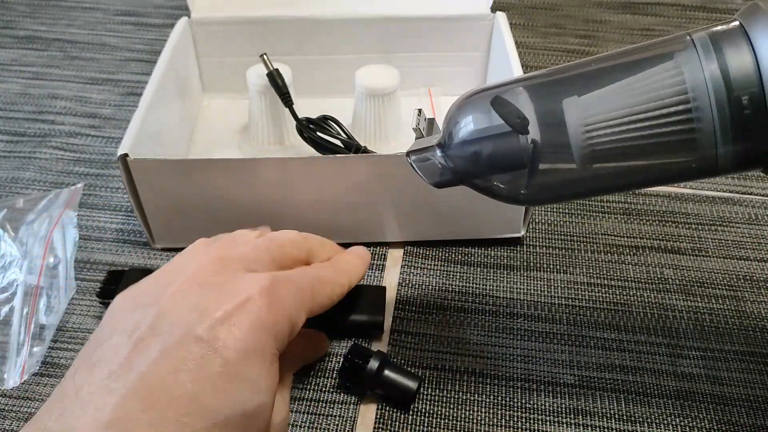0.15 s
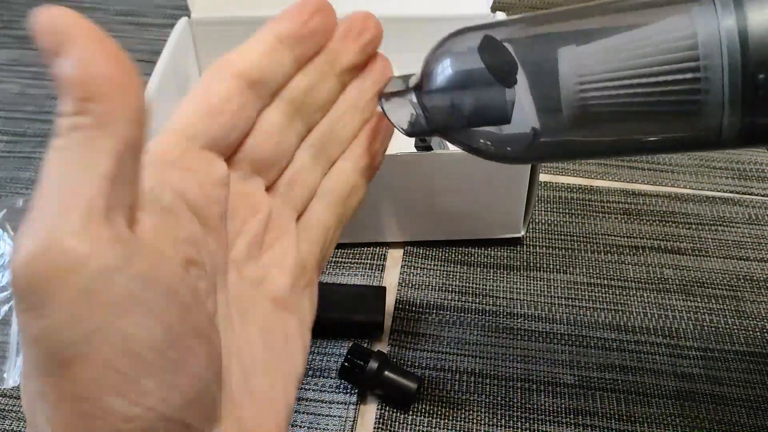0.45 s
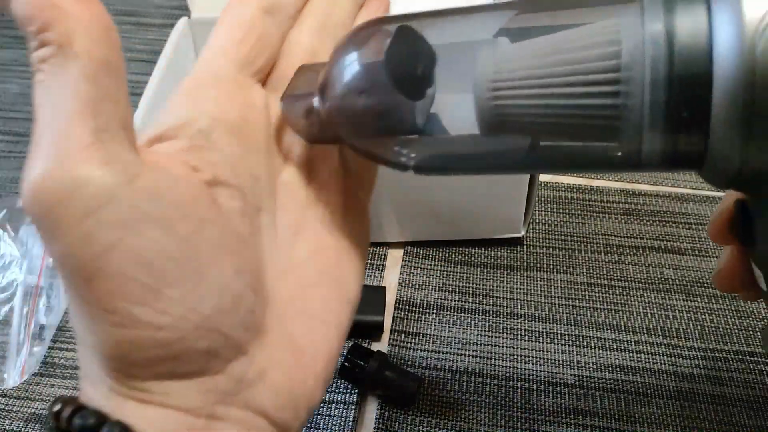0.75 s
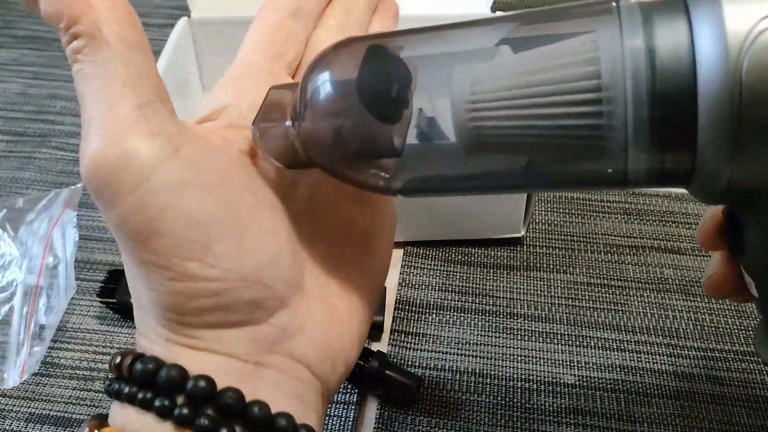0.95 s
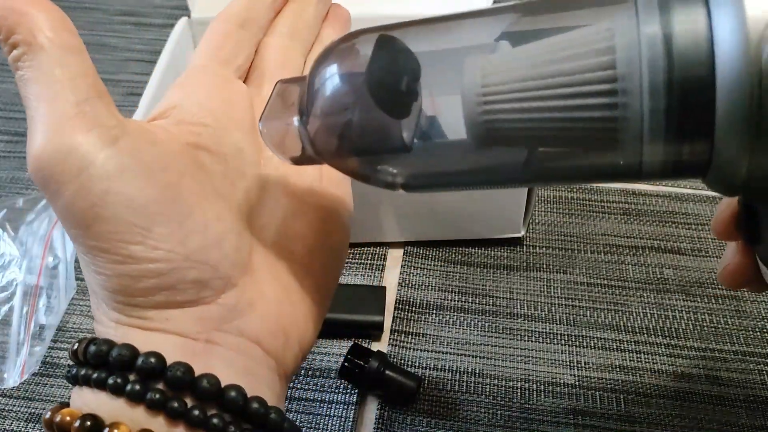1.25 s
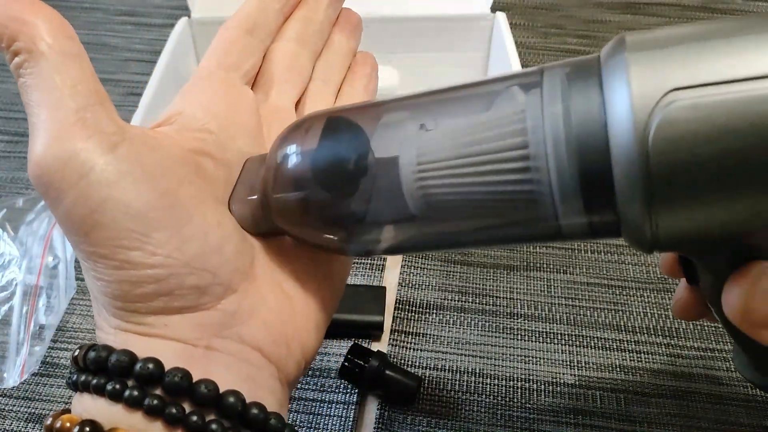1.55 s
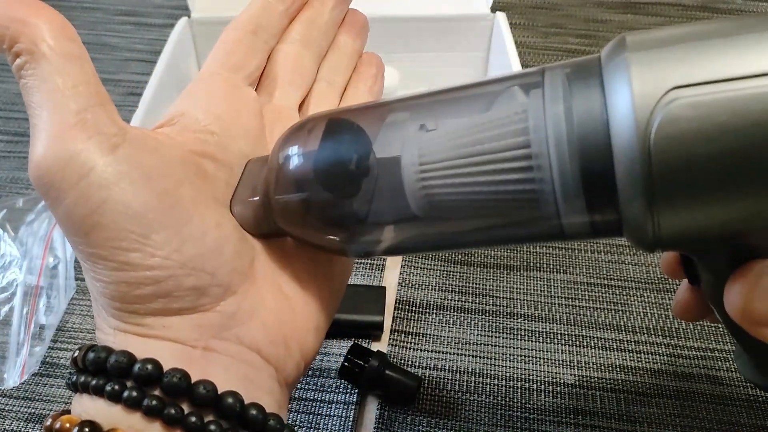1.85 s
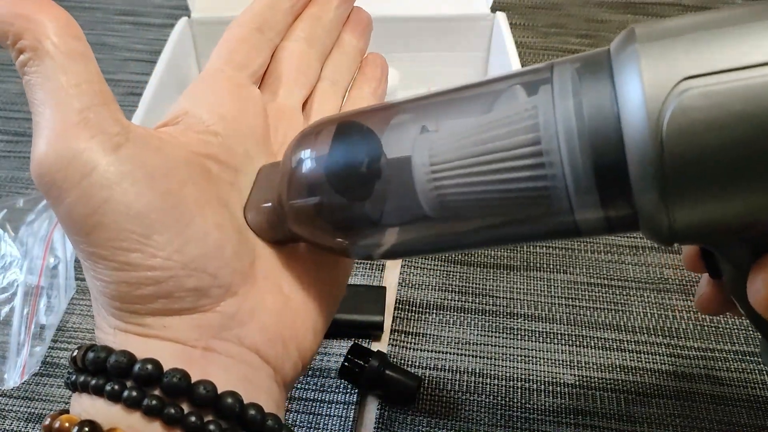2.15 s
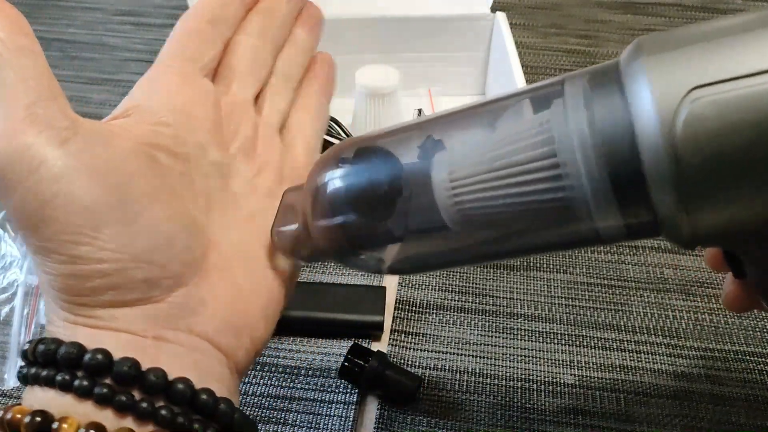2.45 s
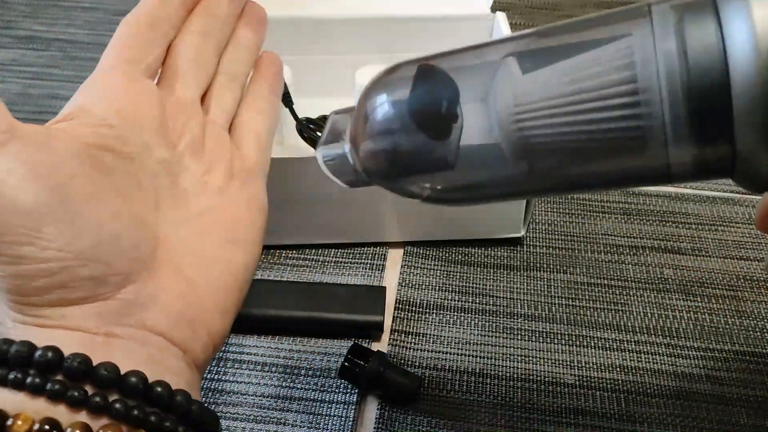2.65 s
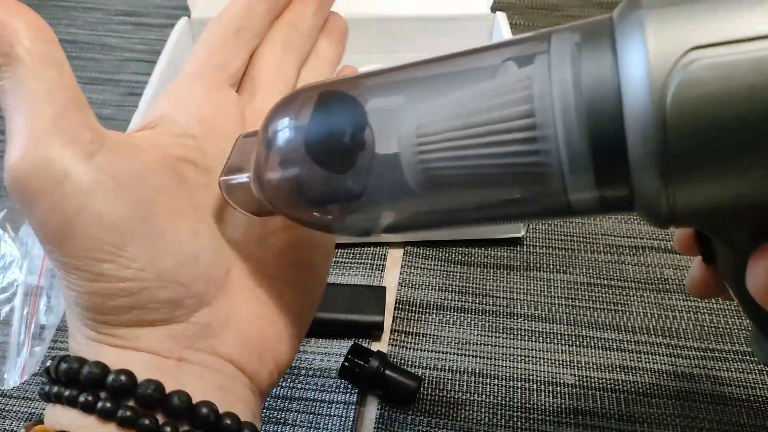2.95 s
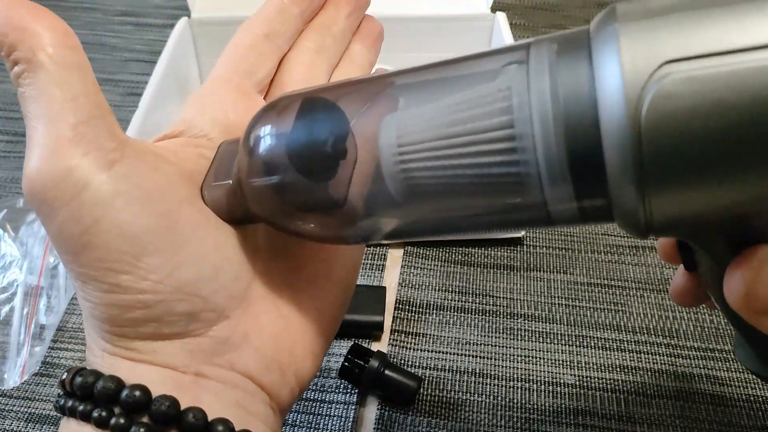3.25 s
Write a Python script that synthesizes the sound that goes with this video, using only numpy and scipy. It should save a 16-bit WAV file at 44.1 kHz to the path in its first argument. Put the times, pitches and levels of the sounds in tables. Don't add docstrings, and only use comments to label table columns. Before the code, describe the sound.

Cordless hand vacuum runs close up, airy roar stopping and motor pitch rising when twice blocked

```python
import sys
import numpy as np
from scipy import signal
from scipy.io import wavfile
from scipy.ndimage import uniform_filter1d

SR = 44100
rng = np.random.default_rng(int(sys.argv[2]) if len(sys.argv) > 2 else 0)


def invert_db(x):
    u = np.asarray(x, float) / 20
    return 10 ** u


def master(y):
    cut = np.clip(np.atleast_2d(y).T, -1, 1)
    pcm = np.round(cut * 32767)
    wavfile.write(sys.argv[1], SR, pcm.astype(np.int16))


N = 149940

# seals at t/s, lets go at t/s
PALM_SEALS = [
    (1.635, 2.545),
    (3.255, 3.6),
]
# t/s, intake roar level/dB, edge whistle level/dB
NOZZLE_AIR = [
    [(0.0, -25.5, -28), (0.052, -28.5, -27), (0.36, -26.5, -27), (0.538, -30, -29.5), (0.582, -29.5, -36),
     (0.742, -32.5, -31.5), (1.45, -27.5, -23), (1.56, -32, -31.5)],
    [(2.6, -29, -29), (2.618, -27, -29.5), (2.926, -28, -29.5), (2.978, -28.5, -23), (3.0, -26, -26),
     (3.086, -31.5, -26.5), (3.222, -28.5, -23.5), (3.23, -35, -24)],
]


def rms_one(x):
    return x / np.sqrt(np.mean(x ** 2) + 1e-20)


def in_time(rows):
    s, *columns = np.transpose(rows)
    return [np.interp(np.arange(N) / SR, s, c) for c in columns]


def at_hz(points, hz):
    table_hz, values = np.transpose(points)
    return np.interp(np.log(hz), np.log(table_hz), values)


def drift(rate):
    r = np.exp(-80 * np.pi * rate / SR)
    slow = signal.lfilter([1], [1, -2 * r, r * r], rng.standard_normal(N // 40 + 2002))[2000:]
    return np.interp(np.arange(N) / 40, np.arange(len(slow)), rms_one(slow))


def resonance(x, hz, width_hz):
    r = np.exp(-np.pi * width_hz / SR)
    return signal.lfilter([1, 0, -1], [1, -2 * r * np.cos(2 * np.pi * hz / SR), r * r], x)


def dip(x, hz, width_hz, share):
    r = np.exp(-np.pi * width_hz / SR)
    return x - share * (1 - r * r) / 2 * resonance(x, hz, width_hz)


def delayed(x, lag_s):
    return np.interp(np.arange(N) - lag_s * SR, np.arange(N), x)


def low_band(x, low, high):
    return signal.sosfilt(signal.butter(2, [low, high], "band", fs=SR, output="sos"), x)


def pair():
    return rng.standard_normal((3, N + SR // 10))


def air(spectrum, likeness, left_lag_s, patchy_db, shared_db):
    # f/Hz, left over right level/dB
    pan = [(60, -3), (200, 2.5), (1000, -2), (3000, 0), (6000, -4.5), (9000, -2.5), (13000, -11),
           (15000, -7)]
    table_hz = np.array(spectrum)[:, 0]
    edges = table_hz[0] * 2 ** np.arange(0, np.log2(table_hz[-1] / table_hz[0]) + .3, 1 / 3)
    out, together, lag = 0, drift(7.3), round(left_lag_s * SR)
    white = [pair(), pair()]
    for k, (low, high) in enumerate(zip(edges, np.minimum(edges[1:], .45 * SR))):
        mid, left, right = low_band(white[k % 2], low, high)
        hz = np.sqrt(low * high)
        alike = np.clip(at_hz(likeness, hz), -1, 1)
        shared = np.sqrt(abs(alike)) * np.array([np.sign(alike) * np.roll(mid, lag), mid])
        both = shared + np.sqrt(1 - abs(alike)) * np.array([left, right])
        patchy = patchy_db * np.array([drift(6.5), drift(3.3)])
        gain = invert_db(at_hz(spectrum, hz) + shared_db * together + patchy)
        out = out + gain * both[:, -N:] * invert_db(at_hz(pan, hz) * np.array([[.5], [-.5]]))
    return rms_one(out)


def sealed():
    t, seal_s = np.arange(N) / SR, .041
    out = np.zeros(N)
    for a, b in PALM_SEALS:
        out += np.clip((t - a) / seal_s + .5, 0, 1) - np.clip((t - b) / seal_s + .5, 0, 1)
    return out


def unloading():
    speed_up_s, slow_down_s = .25, .205
    leak_after_s, leak_sag = .645, 1.8
    t, out = np.arange(N) / SR, np.zeros(N)
    for a, b in PALM_SEALS:
        level = out[int(a * SR)]
        held_s = np.clip(t, a, b) - a
        up = 1 - (1 - level) * np.exp(-held_s / speed_up_s)
        up = up - leak_sag * np.maximum(held_s - leak_after_s, 0) ** 2
        out = np.where(t < a, out, up * np.exp(-np.maximum(t - b, 0) / slow_down_s))
    return out


def gusts(seal):
    t = np.arange(N) / SR
    puffs = np.zeros(N)
    for row in PALM_SEALS:
        for s, db in zip(row, (0, -7)):
            puffs += invert_db(db) * np.exp(-((t - s) / .016) ** 2) * np.sin(2 * np.pi * 59 * (t - s))
    wind = rms_one(low_band(rng.standard_normal((2, N)), 20, 75))
    roar_db = in_time(NOZZLE_AIR[0] + NOZZLE_AIR[1])[0]
    follows_db = 1.5 * (roar_db + 30) * (2 - seal) - 12 * seal
    wind_db = -57 + 4 * drift(2.7) + follows_db + np.array([[-3.], [3.]])
    return invert_db(wind_db) * wind + invert_db(-39 + np.array([[-4.], [2.]])) * puffs


def fan(seal):
    # f/Hz, level/dB per Hz
    fan_spectrum = [(60, -32), (300, -10), (1300, -17.5), (2300, -3), (4500, -2.5), (8300, -12.5),
                    (11000, -24), (17000, -25)]
    # f/Hz, left-right likeness [-1..1]; below 0 the microphones move in opposition
    fan_likeness = [(60, .1), (1250, .9), (1550, -.65), (2300, -.65), (3000, -.7), (3900, .4), (6000, 0),
                    (8500, .55)]
    rush = air(fan_spectrum, fan_likeness, 0, patchy_db=0.0, shared_db=1.0)
    return invert_db(-21 - 8 * (1 - seal)) * rush


def intake(seal):
    # f/Hz, level/dB per Hz
    roar_spectrum = [(35, -63), (60, -93), (102, -17.5), (199, -1), (423, -3), (460, 5.5), (670, -63),
                     (772, -13), (1000, -17.5), (1300, -51), (2200, -120)]
    # f/Hz, level/dB per Hz
    hiss_spectrum = [(800, -25), (1600, 1.5), (2700, -6.5), (3600, 1), (6000, 2.5), (7800, -5),
                     (10500, -20), (17000, -11.5)]
    # f/Hz, left-right likeness [0..1]
    nozzle_likeness = [(60, 0.1), (150, 1), (400, 0.9), (800, .65), (1800, 0.92), (3100, 0.97), (4200, 0.2),
                       (15000, 0.05)]
    left_lag_s, cup_hz, whistle_hz = -.00018, 458, 11460
    roar_db, whistle_db = in_time(NOZZLE_AIR[0] + NOZZLE_AIR[1])

    hoot = rms_one(resonance(resonance(rng.standard_normal(N), cup_hz, 30), cup_hz, 27))
    roar = air(roar_spectrum, nozzle_likeness, left_lag_s, patchy_db=0.0, shared_db=-0.54)
    roar = invert_db(roar_db) * (roar + invert_db(-9 + 2 * drift(4.2)) * hoot)

    edge = rng.standard_normal((2, N)) + 0.64 * rng.standard_normal(N)
    edge = resonance(resonance(edge, whistle_hz, 540), whistle_hz, 2000)
    whistle = invert_db(whistle_db + 1.03 * drift(41) + np.array([[-2.], [5.]])) * rms_one(edge)

    hiss = invert_db(-17.5) * air(hiss_spectrum, nozzle_likeness, left_lag_s, patchy_db=1.5, shared_db=0.3)
    hiss = dip(hiss, 2850, 450, .35)
    hiss = dip(hiss, 4200, 400, .45)
    return (1 - seal) * (roar + whistle + hiss)


def close_echoes(noise):
    bounces = [
        (.0009, .0011, -4.5),
        (.0021, .0017, -8),
        (.0034, .0029, -10),
    ]
    bright = signal.sosfilt(signal.butter(2, 7000, "high", fs=SR, output="sos"), noise)
    for *lags, db in bounces:
        bounce = [delayed(v, s + .00002 * drift(0.96)) for v, s in zip(bright, lags)]
        noise = noise + invert_db(db) * np.array(bounce)
    return noise


def motor(seal):
    # t/s, f/Hz (unused), level/dB, left over right level/dB
    whine = [(0.0, 1209, -27, -14), (0.38, 1199, -28.5, -17.5), (0.99, 1199, -23, -3.5),
             (1.64, 1199, -24, -5.5), (1.72, 1236, -20.5, -3), (1.92, 1287, -19.5, -2),
             (2.31, 1318, -20.5, 2.5), (2.54, 1317, -18.5, 1.5), (2.64, 1257, -23, -1.0),
             (2.84, 1212, -19.5, -2), (3.14, 1199, -23, 1), (3.28, 1210, -20.5, -2.5), (3.38, 1247, -19, 4),
             (3.4, 1284, -22.5, 3)]
    # t/s, left lead of the whine/rad
    whine_lead = [(0, 1.8), (.7, -1), (1.5, -0.64), (1.9, -0.0045), (2.6, -0.54), (3.4, -0.086)]
    orders = [(1, -1, 0), (1, 1, 0), (2, 0, 0), (2, 1, 0), (2, 2, 0), (3, -1, 0), (3, 0, 0), (3, 1, 0),
              (4, -1, 0), (4, 0, 0), (4, 1, 0), (5, -1, 1), (5, 0, 0), (5, 1, 0), (6, 0, 0), (7, -2, 0),
              (7, -1, 0), (7, 0, 0), (3, -1, 1), (3, -2, 1), (4, 0, -1), (1, -1, 1), (4, -2, 0), (5, -1, 0)]
    # left open/dB, right open/dB, left sealed/dB, right sealed/dB
    overtones = [(-50, -44, -42, -40), (-54, -54, -54, -54), (0, 0, 0, 0), (-48, -45, -27, -25.5),
                 (-55, -55, -36, -35), (-29, -39, -31, -24), (0, 0, 0, 0), (-37, -34, -34, -33),
                 (-39, -35, -39, -37), (0, 0, 0, 0), (-37, -35, -39, -34), (-46, -42, -42, -35),
                 (0, 0, 0, 0), (-50, -41, -46, -39), (-46, -38, -46, -38), (-60, -60, -57, -57),
                 (-60, -60, -57, -58), (-52, -51, -52, -52), (-41, -44, -34, -29), (-44, -48, -52, -44),
                 (-46, -48, -40, -39), (-58, -58, -53, -54), (-44, -41, -48, -46), (-43, -41, -45, -39)]
    # t/s, second/dB, third/dB, fourth/dB, fifth/dB
    beams = [
        [(.1, -40, -55, -28, -43), (.54, -27.5, -27, -27.5, -44), (.75, -29, -24.5, -19, -36),
         (1.1, -25.5, -51, -45, -36), (1.4, -29, -46, -30, -28), (1.61, -28, -34, -37, -33),
         (1.82, -24, -25, -26, -35), (2.02, -21, -26.5, -20, -38), (2.21, -22.5, -33, -27.5, -45),
         (2.45, -21, -27, -27.5, -38), (2.62, -33, -25.5, -31, -46), (2.81, -30, -51, -38, -46),
         (3.02, -25.5, -28, -24, -45), (3.23, -25, -50, -27, -35)],
        [(.1, -38.5, -49, -37, -28), (.35, -37, -53, -39, -31), (.54, -40, -27, -42, -28),
         (.75, -43, -35, -28, -34), (1., -26, -38, -22, -28), (1.4, -36, -28.5, -24, -34),
         (1.61, -27, -25.5, -24.5, -41), (1.82, -28, -23, -27, -26), (2.02, -36, -30, -22, -27),
         (2.21, -44, -40, -21, -31), (2.45, -20, -34, -28.5, -25), (2.62, -32, -27, -30, -25),
         (2.81, -28.5, -31, -39, -42), (3.02, -30, -35, -32, -37), (3.23, -25.5, -43, -27, -41)],
    ]
    swell = {(2, 1, 0): (-6, 20), (3, -1, 0): (-12, 11), (3, -1, 1): (18, 13), (4, -1, 0): (30, -14),
             (5, -1, 0): (25, 25)}
    leads = {(1, -1, 0): (-1, .1), (2, 0, 0): (-1.4, -2), (2, 1, 0): (-3.4, -2.2), (3, -1, 0): (.6, .1),
             (3, -1, 1): (1, -.2), (3, 0, 0): (-1, .4), (3, 1, 0): (-.8, .7), (4, 0, 0): (-3.7, .5),
             (4, 1, 0): (1.5, -1), (5, 0, 0): (1.6, 2.5), (6, 0, 0): (-1.5, -.2)}
    open_hz, sealed_hz = 1191.6, 1332
    cage_open, cage_sealed = .1152, .1163
    slip = .0178
    wander_db, wander_per_s = 1.2, 1.5

    free = unloading()
    hz = (open_hz + (sealed_hz - open_hz) * free) * (1 + .0005 * drift(5.4))
    turn = 2 * np.pi * np.cumsum(hz) / SR
    cage = 2 * np.pi * np.cumsum(hz * (cage_open + (cage_sealed - cage_open) * free)) / SR
    _, db, pan_db = in_time(whine)
    lead, = in_time(whine_lead)
    out = invert_db(db + np.array([pan_db, -pan_db]) / 2) * np.sin([turn + lead, turn])

    soft = uniform_filter1d(seal, size=4000)
    turned = soft * np.minimum(free / .75, 1) ** 2
    gained = np.maximum(free - .76, -.25) * soft
    beam = [{(k, 0, 0): db for k, db in zip((2, 3, 4, 5), in_time(rows))} for rows in beams]
    for order, row in zip(orders, overtones):
        k, side, beat = order
        start = rng.uniform(0, 2 * np.pi)
        lead_open, lead_sealed = leads.get(order, (-np.pi / 2, -np.pi / 2))
        lead = lead_open + (lead_sealed - lead_open) * turned
        for ear in (0, 1):
            db = row[ear] + (row[ear + 2] - row[ear]) * soft + beam[ear].get(order, 0)
            db = db + swell.get(order, (0, 0))[ear] * gained + wander_db * drift(wander_per_s)
            phase = (k + beat * slip) * turn + side * cage + start - ear * lead
            out[ear] += invert_db(db) * np.sin(phase + .3 * drift(wander_per_s))
    return np.sqrt(2) * out


def scene():
    seal = sealed()
    noise = close_echoes(intake(seal) + fan(seal))
    return noise + motor(seal) + gusts(seal)


def top_cut(x):
    return signal.sosfilt(signal.butter(12, 15900, fs=SR, output="sos"), x)


def record(dry):
    dry = dip(dry, 8080, 500, 0.7)
    cut = signal.sosfilt(signal.cheby2(20, 50, 15680, fs=SR, output="sos"), dry)
    return top_cut(cut)


dry = scene()
out = record(dry)
master(out)
```